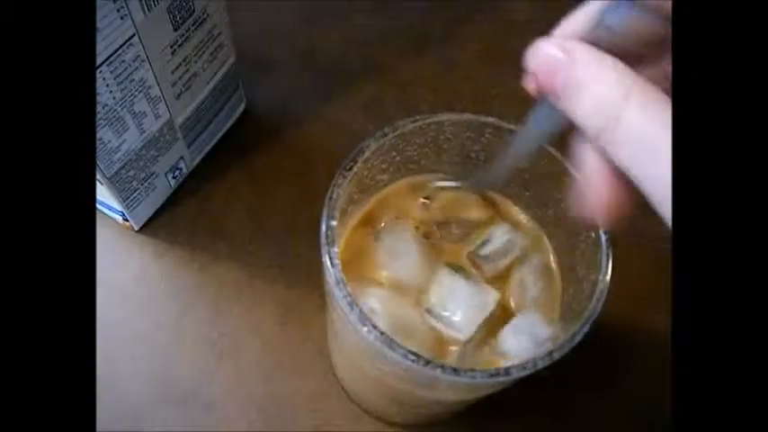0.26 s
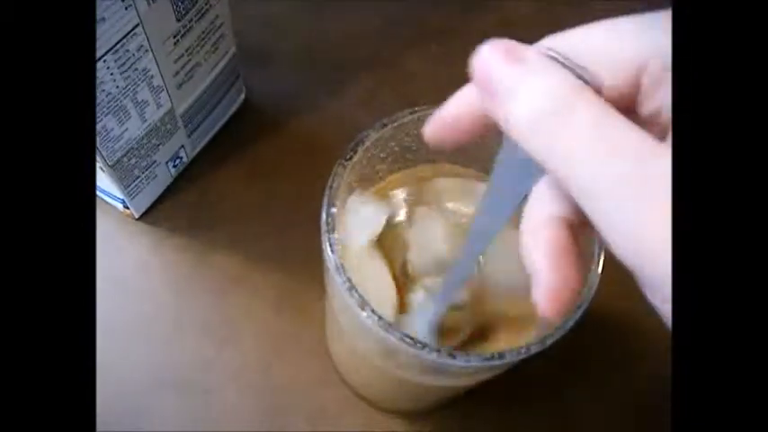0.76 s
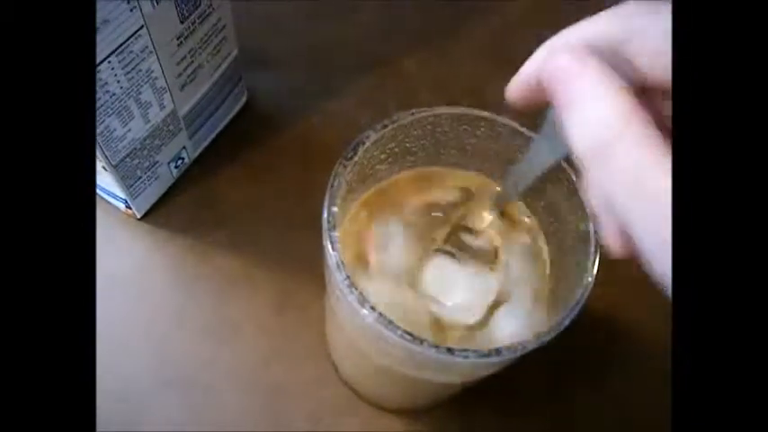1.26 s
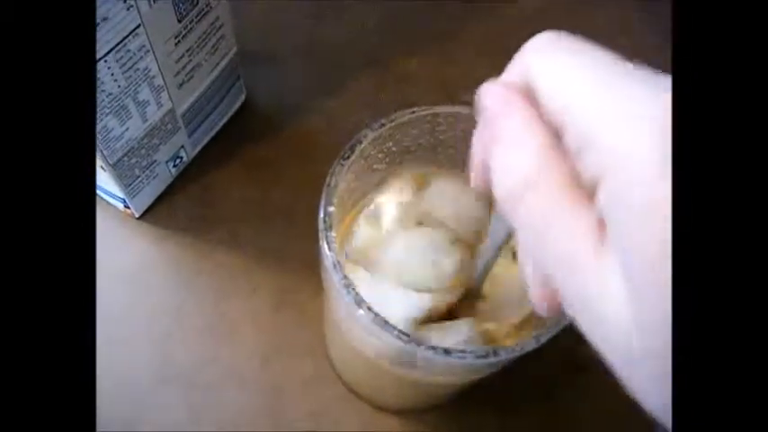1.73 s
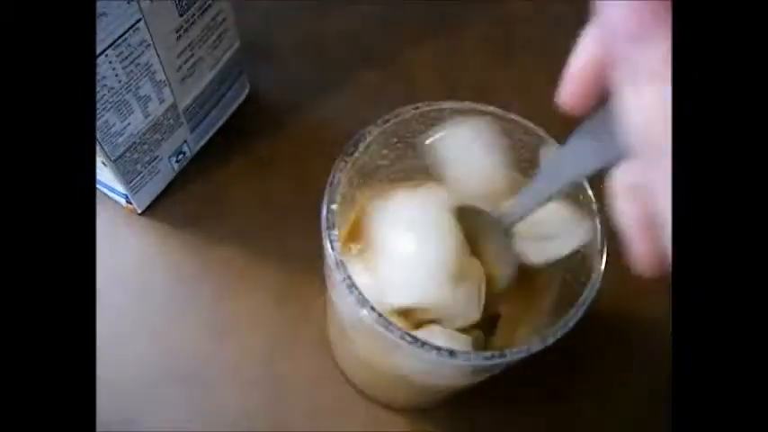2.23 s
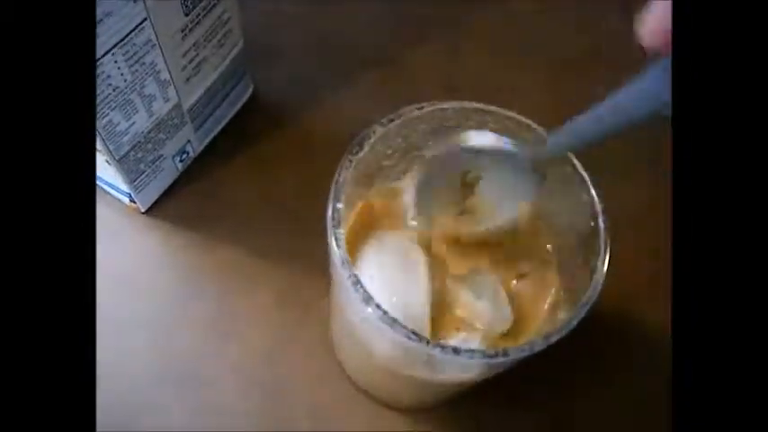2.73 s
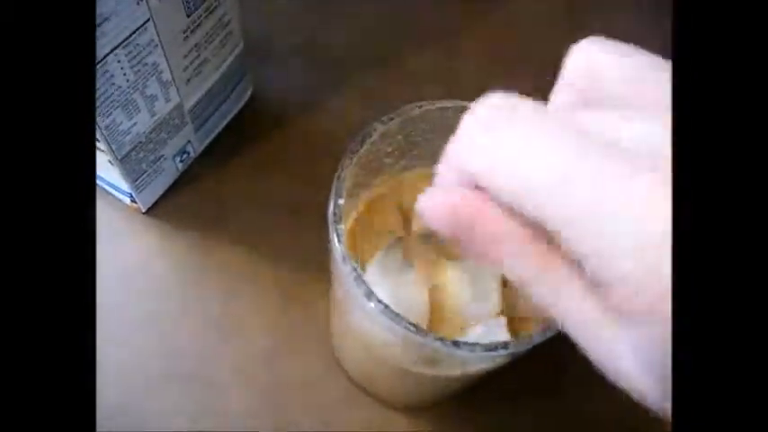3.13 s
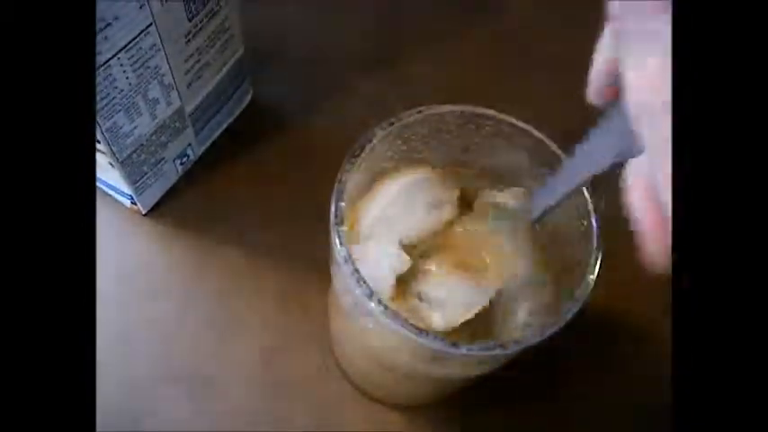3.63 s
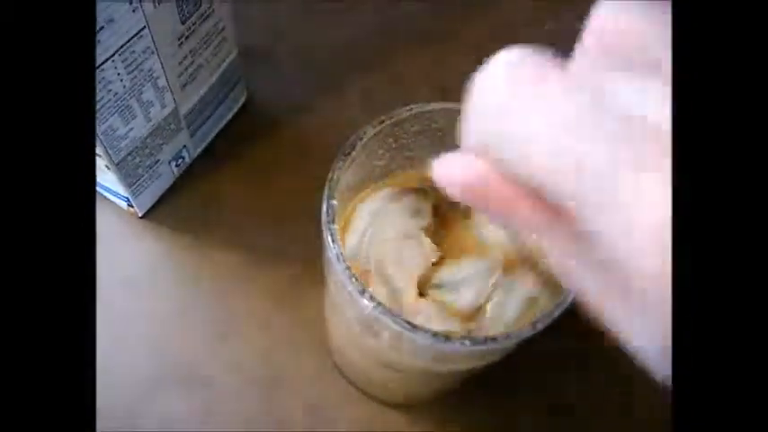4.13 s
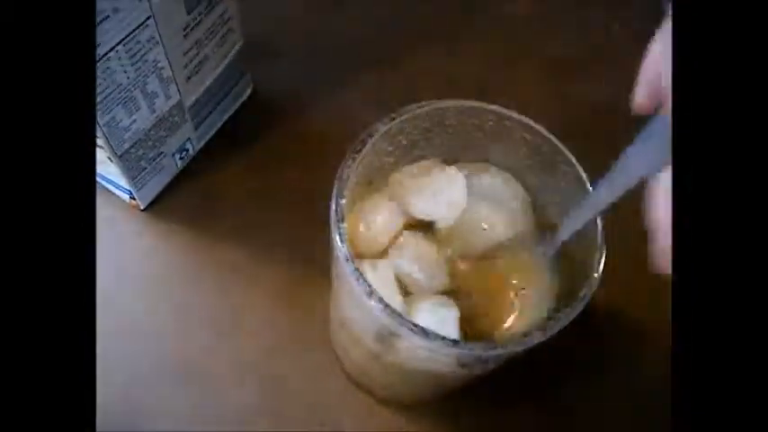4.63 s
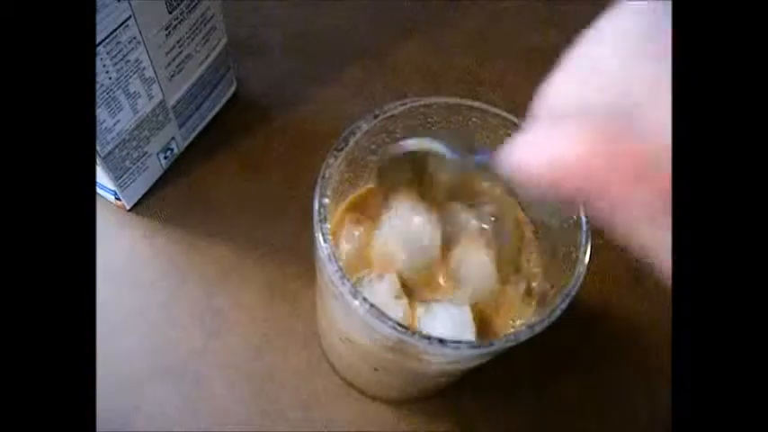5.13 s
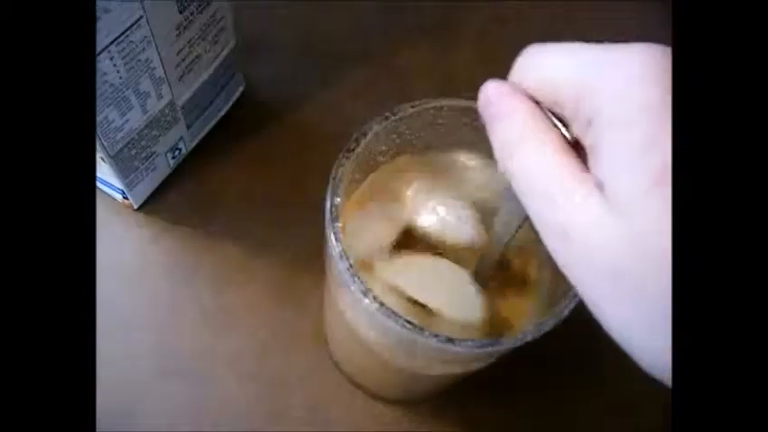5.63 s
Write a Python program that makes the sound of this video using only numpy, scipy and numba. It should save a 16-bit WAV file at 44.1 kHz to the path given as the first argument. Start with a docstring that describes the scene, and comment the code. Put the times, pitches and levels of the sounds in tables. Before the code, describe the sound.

A metal spoon stirs ice cubes in a nearly full cup of iced drink on a wooden table. Short glassy clicks come in uneven clusters, densest and loudest just after two seconds, over faint continuous rattling and scraping. Small thuds, dull wall hum and liquid blips sit beneath. Very close small microphone, dry indoor room, light hiss, peaks slightly overloaded.

```python
"""Ice stirred in a tumbler

A steel spoon stirs ice cubes in a glass on a wooden table, close to a small microphone.
Cubes and spoon knock as decaying sines and noise puffs, over many faint knocks and scraping friction noise.
The glass wall hums, jolts thud through the table top, liquid sloshes and gurgles as further decaying sines.
A short dull tail and steady hiss lie behind; the loudest peaks overload the recorder."""
import sys
import numpy as np
from scipy import signal
from scipy.fft import rfft, irfft, next_fast_len
from scipy.io import wavfile
from scipy.ndimage import uniform_filter1d
from numba import njit

SR = 44100
rng = np.random.default_rng(int(sys.argv[2]) if len(sys.argv) > 2 else 0)


def master_out(mix):
    """Clip the mix to full scale and print it as 16-bit PCM to the path in sys.argv[1]."""
    frames = np.transpose(np.atleast_2d(mix))
    ceiling = np.clip(frames, -1, 1)
    pcm = np.round(ceiling * 32767).astype(np.int16)
    wavfile.write(sys.argv[1], SR, pcm)


N = 259517  # length in samples

# Levels in these tables are relative: each source sets its own gain on top.
# Loud knocks of cubes and spoon. Each row: start [s], level [dB], cube pitch [Hz], its upper pitch [Hz],
# upper level [dB], sharpness [dB]; the last two relative to the knock.
KNOCKS = [(0.0014, -1.5, 2840, 3530, -2.5, -30), (0.0173, -9.5, 2700, 4370, -2, -4.5),
          (0.0583, -25, 2760, 3920, 6, -14), (0.072, 1, 2760, 3900, -9, -16.5),
          (0.0854, -5, 2790, 4000, -9, -43), (0.1053, -5, 2540, 4010, -16, -28),
          (0.1153, -3.5, 2480, 3950, -15, -18), (0.1393, -15, 2760, 3880, -20, -8),
          (0.1772, -8.5, 1940, 4600, -6, -10), (0.2044, -7, 1990, 4610, -16, -16),
          (0.2275, -2.5, 2830, 4000, -16, -12.5), (0.2442, 2.5, 3300, 4270, -7.5, -16),
          (0.2905, -7.5, 2920, 3900, -15, -19), (0.3394, -6, 2800, 3860, -14, -23),
          (0.4477, -11.5, 2730, 4000, -11, -21.5), (0.483, -13.5, 2740, 3870, -1, -7),
          (0.5103, -9.5, 2770, 4040, -4, -31), (0.5666, -23, 2750, 4000, -2, -22),
          (0.6292, -12, 2700, 3840, -28, -9), (0.7022, -0.5, 2680, 4400, -28, -29),
          (0.7367, -20.5, 2620, 4240, -5.5, -11), (0.7799, -7, 2800, 4080, -8, -21),
          (0.8261, -10.5, 3060, 4400, -9, -16), (0.9597, -9.5, 3100, 4050, -14, -26),
          (1.012, -7, 2920, 4050, -4.5, -21), (1.0334, -9, 2840, 4370, -3.5, -25),
          (1.0867, -17, 2850, 3810, -14, -37), (1.1113, -10, 2770, 3900, -21, -34),
          (1.1328, -6, 2890, 3900, -8, -28), (1.1437, -3, 2810, 4140, -8, -23),
          (1.1787, -10, 2710, 3960, -12, -12.5), (1.2465, -21.5, 2950, 3910, -1, -2.5),
          (1.3265, -6, 2690, 3660, -12, -28), (1.384, -14, 2580, 3690, -1, -19),
          (1.4223, -13, 2100, 3900, -5, -19), (1.4484, -7.5, 2590, 3790, -0.5, -15),
          (1.5048, -9, 2650, 4050, -15, -23), (1.5369, -26, 2740, 3900, -16, -16),
          (1.548, -3, 2770, 3826, -6.5, -9), (1.568, -23, 2830, 4000, -6, -21),
          (1.5963, -11.5, 2840, 3870, -4.5, -18), (1.6342, -13, 2730, 3970, -5, -23),
          (1.6452, -9.5, 2840, 4050, -3, -16), (1.6842, -10, 2690, 3960, -12, -30),
          (1.714, -13, 2740, 4880, -1, -15), (1.7334, -6, 2490, 3750, 0.5, -25),
          (1.7853, -12.5, 2460, 3910, -3, -12), (1.8, -15.5, 3010, 3950, 0, -15),
          (1.85, -5.5, 3200, 3400, -11, -22), (1.8679, -0.5, 3010, 4600, -19, -20),
          (1.8768, -13, 3070, 3770, -11, -17), (1.8865, 0.5, 3170, 4090, -16, -23),
          (1.92, -12, 2880, 3830, -4, -31), (1.948, -6.5, 3060, 3680, 0, -25),
          (1.9962, -6, 2870, 3870, -7, -22.5), (2.0104, -15, 2860, 3880, -9, -29),
          (2.0193, -4, 2820, 3900, -24, -34), (2.043, -7, 2360, 3770, -27, -32),
          (2.0643, -2.5, 2560, 4580, -17, -27.5), (2.1018, -17, 3280, 3430, -1.5, -29),
          (2.1542, -18, 3000, 4020, -5.5, -17), (2.1827, -2.5, 2240, 3350, -3.5, -39),
          (2.1986, -0.5, 2580, 4100, -13, -32), (2.2117, -10.5, 3220, 3900, -10, -27),
          (2.253, 0, 2500, 3450, -14, -24), (2.266, -3, 2900, 3650, -11, -27),
          (2.2716, 7.5, 2760, 4220, -12.5, -21.5), (2.3066, -3, 2740, 3620, -14, -25),
          (2.32, 4, 2480, 3940, -0.5, -16), (2.358, 6, 2220, 4600, -13, -26.5),
          (2.3781, 6, 2275, 4070, -8.5, -23.5), (2.4217, -5.5, 3270, 4030, -17, -35),
          (2.429, -5.5, 2320, 4550, -12, -21), (2.5109, 6, 2393, 3940, -16.5, -37),
          (2.5503, 3, 2550, 4680, -9, -18.5), (2.5634, -2.5, 2000, 4400, -6.5, -27),
          (2.612, -16.5, 3060, 4040, -1, -32), (2.6215, -9.5, 2590, 3940, -15, -30),
          (2.6512, -2.5, 2480, 3790, -13, -27), (2.7024, -2, 2500, 3680, -26, -12.5),
          (2.7216, -11.5, 2660, 3810, -5, -11), (2.7369, -9.5, 2470, 3930, -3, -33),
          (2.744, -13, 2450, 3820, -2, -20), (2.7746, -8, 2930, 3970, -3, -23),
          (2.8052, -5.5, 2600, 3620, -9, -36), (2.819, -11, 2660, 4050, -8, -14),
          (2.8228, -5, 2700, 4010, -7, -5), (2.8653, 2, 3060, 3966, -6, -14.5),
          (2.9048, -4, 1580, 3600, -19, -15.5), (2.9462, -10, 2710, 4040, -4, -24),
          (2.9764, 0.5, 2690, 4610, -15, -31), (2.9848, 0, 2010, 3640, -21, -10),
          (3.0143, 0.5, 2820, 3730, -10, -22), (3.0573, -6.5, 2820, 5070, -14, -20.5),
          (3.0942, -18, 2020, 3740, -17, -32), (3.1271, -5.5, 1610, 3970, -22, -40),
          (3.1337, -9, 2040, 4970, -17, -21), (3.1508, -4, 2900, 4120, -9, -24),
          (3.2147, -8.5, 2020, 4000, -6, -33), (3.269, -10, 2240, 3960, -5.5, -43),
          (3.3266, -10, 2820, 4210, 3.5, -10.5), (3.3379, 3, 2640, 3650, -14, -25),
          (3.3487, -4, 3000, 4000, -6, -16), (3.3797, -5.5, 3080, 3420, 1, -36),
          (3.389, -5, 2540, 4420, -5.5, -39), (3.4508, -7.5, 2770, 3720, -8, -41),
          (3.5633, -1, 2940, 4380, -11.5, -19), (3.5746, -5.5, 2620, 3880, -18, -7),
          (3.6006, -11.5, 2780, 3880, -7.5, -29), (3.6391, -8.5, 1630, 3840, -28, -40),
          (3.6526, -9, 1610, 3960, -30, -44), (3.6638, -3, 2760, 3960, -1, -32),
          (3.6759, -5.5, 2530, 4560, -17, -20.5), (3.7225, -0.5, 2460, 3760, -13, -33),
          (3.7705, -10.5, 2380, 3460, -17, -11.5), (3.828, -20.5, 2830, 3940, -7, -28),
          (3.8895, -1, 2720, 4790, -16, -18.5), (3.9399, -9, 2680, 3800, -17, -24),
          (3.9735, -24, 2720, 3680, -18, -13), (4.0206, -14.5, 2880, 3830, -12, -22),
          (4.0671, -8, 2640, 4270, -14, -13), (4.1024, -4.5, 2610, 4070, -6.5, -8.5),
          (4.1144, -26, 2950, 4370, -15, 12), (4.1339, -6.5, 2820, 4010, -3, -10),
          (4.143, 2, 2663, 4270, -2.5, -21), (4.192, -9, 2590, 3740, -1, -8),
          (4.2236, -3.5, 2800, 3930, -5, -33), (4.2424, -10, 2360, 3830, -5, -26),
          (4.2567, -16.5, 2610, 3630, -2, -9), (4.269, -8.5, 2750, 4340, -1, -16),
          (4.2794, -12, 2520, 4660, -18, -5), (4.336, -18, 2700, 3700, -1, -13),
          (4.3666, -12, 2530, 3870, -1, -21), (4.407, -11.5, 2490, 4180, 0, -20),
          (4.4179, -2, 2510, 3800, -1, -24.5), (4.437, -7, 2690, 3930, -9, -29),
          (4.4506, -3, 2640, 3990, -1, -26), (4.498, -21, 2820, 4010, -2, -17),
          (4.5113, -1.5, 2866, 3900, 0.5, -8.5), (4.5264, -22, 2780, 3860, 3, -23),
          (4.607, -7.5, 2500, 4160, -2.5, -28), (4.6151, -1, 2750, 3560, -7.5, -11.5),
          (4.6328, -10.5, 3020, 3400, -5, -32), (4.6673, -2.5, 2910, 3460, -18, -24),
          (4.6771, -5.5, 2320, 3730, -17, -21), (4.701, -2, 2220, 3680, -15, -42),
          (4.7269, -6, 2160, 3900, -4, -45), (4.7566, 2, 2150, 4990, -6.5, -16),
          (4.8204, -15.5, 2220, 3680, -2, -37), (4.8996, -13, 3360, 3950, -13, -36),
          (4.9358, -13, 1610, 3670, -31, -37), (4.9692, -7, 1680, 4670, -9, -35),
          (5.007, -18.5, 1950, 3800, -9, -37), (5.0664, -6, 2760, 5250, -16, -14),
          (5.1053, -11.5, 2660, 4270, -12, -18), (5.1272, 2, 2700, 5040, -8.5, -16.5),
          (5.2051, -5.5, 2590, 3760, -5.5, -21), (5.229, -11.5, 2930, 3870, -1, -23),
          (5.2518, -3.5, 2830, 4100, -3, -1.5), (5.2904, -17, 2820, 4360, -13, -15),
          (5.3144, -8, 1990, 4040, -17, -14), (5.3217, -2.5, 1750, 3950, -17, -28),
          (5.3336, -4.5, 1720, 3960, -1, -29), (5.3478, -12.5, 3000, 3930, 0, -13),
          (5.3757, -9.5, 1660, 3810, -2, -18), (5.3827, -11.5, 2700, 4770, -4, -14),
          (5.3961, -11.5, 1670, 4940, 5, -32), (5.442, -17, 2700, 3850, -3, -35),
          (5.5106, -15, 2750, 3820, -17, -39), (5.5817, -12.5, 2500, 3840, 0, -27),
          (5.6007, 2.5, 2530, 5050, -11, -25), (5.6357, -6, 2780, 3720, -12, -23),
          (5.6473, -9.5, 2840, 3800, -7, -13.5), (5.664, -6, 1950, 4200, -8, -27),
          (5.691, -10, 3220, 3670, -1, -35), (5.7265, -4.5, 2800, 3920, -4, -17),
          (5.7487, 2, 3270, 3710, -8.5, -28), (5.7634, -12.5, 2000, 3740, -5, -16),
          (5.7972, -7, 3170, 3550, 5, -16), (5.8168, -19, 2870, 3500, 3, -18),
          (5.8478, -5, 3130, 3800, -15, -22)]
# Blows that leave the spoon ringing. Each row: start [s], level [dB], pitch it rings most near [Hz].
CLINKS = [(2.5628, -4, 10400), (2.822, 1, 9030), (2.9841, 2.5, 10300), (3.7713, -8, 10100),
          (3.8916, -10, 9600), (3.9064, -24, 9210), (3.9404, -10.5, 10800), (3.9729, -26, 10800),
          (4.0677, -5.5, 9200), (4.0824, -17, 10800), (4.103, 6.5, 11000), (4.1154, -8, 11000),
          (4.1335, -25, 10700), (4.192, -21, 8860), (4.756, -3.5, 11300), (4.9686, -6.5, 10000),
          (5.0689, -2.5, 10900), (5.1058, -5, 11500), (5.2525, -6, 10800)]
# Cubes dragging along the wall. Each row: middle [s], half length [s], level [dB].
SLIDES = [(0.11, 0.006, -27), (0.398, .012, -16), (0.657, 0.031, -19), (0.821, 0.016, -22),
          (1.003, 0.024, -18.5), (1.129, 0.0072, -11.5), (1.876, 0.054, -13.5), (2.32, 0.0062, -27),
          (2.542, 0.0057, -6.5), (3.147, .008, -23), (3.208, 0.012, -19.5), (3.35, 0.027, -8.5),
          (3.519, 0.0058, -8), (4.198, 0.012, -16), (4.274, .02, -28), (4.595, 0.0084, -16.5),
          (4.704, 0.011, -25), (5.347, 0.026, -19), (5.598, 0.01, -21), (5.19, 0.013, -14.5),
          (5.7, 0.04, -18)]
# Blows and rubs that set the glass wall humming. Each row: start [s], level [dB].
HUMS = [(0.0114, -26), (0.063, -28), (0.1398, -21), (0.172, -23.5), (0.2349, -22), (0.34, -28),
        (0.6277, -25.5), (0.6946, -20), (0.7326, -19), (0.7775, -33), (1.0022, -19), (1.1164, -25),
        (1.1508, -18), (1.2395, -24), (1.2908, -26), (1.332, -25.5), (1.8808, -30), (2.3207, -24),
        (2.8624, -25.5), (2.9942, -27), (3.3946, -28), (3.4484, -26), (3.5189, -27), (3.5702, -33.5),
        (3.666, -23), (4.2245, -24), (4.2699, -24.5), (4.411, -24), (4.44, -31.5), (5.2557, -29),
        (5.314, -32), (5.3474, -23), (5.6521, -23), (5.74, -31)]
# Jolts through the table top. Each row: start [s], level [dB], pitch [Hz].
THUDS = [(0.25, -13.5, 458), (0.51, -20, 332), (0.638, -20.5, 172), (0.774, -20.5, 416),
         (0.994, -21.5, 390), (1.052, -23, 318), (1.135, -20, 348), (1.327, -25, 300), (1.422, -15, 484),
         (1.443, -7, 297), (1.476, -17, 157), (1.876, -20, 191), (2.047, -19.5, 223), (2.068, -22, 175),
         (2.201, -16.5, 276), (2.278, -23, 326), (2.559, -18.5, 394), (2.906, -15, 295), (3.016, -18, 470),
         (3.15, -15, 294), (3.35, -16, 180), (4.145, -13.5, 272), (4.226, -16.5, 320), (4.283, -14.5, 251),
         (4.449, -19, 305), (4.683, -24, 472), (4.709, -18, 285), (5.106, -17.5, 182), (5.135, -10.5, 310),
         (5.249, -27, 298), (5.35, -19.5, 243), (5.375, -17.5, 182), (5.395, -20.5, 270), (5.411, -19, 230),
         (5.589, -18, 378)]
# Round notes from the liquid. Each row: start [s], level [dB], pitch [Hz].
GURGLES = [(0.339, -20, 763), (0.377, -15, 770), (0.389, -17.5, 1030), (0.454, -17, 1075),
           (0.703, -14, 1080), (0.738, -19, 1130), (1.328, -10, 1030), (1.344, -35, 1080),
           (1.423, -17, 710), (2.066, -19, 960), (2.536, -17, 813), (3.015, -25, 724), (3.452, -25, 1030),
           (3.481, -16.5, 1110), (4.152, -19, 1130), (5.138, -21, 790)]
# Course of the stirring. Each row: time [s], small clatter level [dB], slosh level [dB].
STIRRING = [(0.0, -31.5, -33), (0.11, -25.5, -38.5), (0.46, -33.5, -38.5), (1.13, -28, -38.5),
            (1.39, -30, -34), (1.83, -32.5, -41.5), (2.24, -31.5, -41), (2.6, -37, -42.5),
            (2.82, -38.5, -44.5), (3.18, -31, -37), (3.54, -31.5, -38.5), (3.7, -35.5, -43),
            (3.91, -50, -45), (4.06, -37, -40.5), (4.27, -30, -35.5), (4.47, -29.5, -43),
            (4.57, -33.5, -38.5), (4.83, -37, -45), (5.01, -48.5, -53), (5.14, -44, -38), (5.27, -28, -36),
            (5.63, -31.5, -39), (5.76, -26.5, -44), (5.88, -24.5, -35)]

# Ringing modes of glass, spoon, glass wall and table top.
# Each row: nominal pitch [Hz], level [dB], typical time to fall 60 dB [s].
GLASS_LOW_MODES = [(2050, -11, 0.016), (2270, 3, 0.0093), (2632, 5.5, 0.029), (2724, -0.5, 0.098),
                   (2915, 6.5, 0.012), (3180, -6.5, 0.048)]
GLASS_HIGH_MODES = [(3869, -16, 0.064), (3792, 2.5, 0.015), (3900, -13.5, 0.11), (4350, -0.5, 0.0077),
                    (4657, -2, 0.02), (4800, -24, 0.03)]
GLASS_TOP_MODES = [(5040, -7, 0.12), (6180, -2, 0.03), (6360, 12.5, 0.0064), (6860, 4.5, 0.018)]
SPOON_MODES = [(9040, 0, .065), (9250, -7, .03), (10350, -6, .04), (10780, 0, .05), (11440, -5, .04),
               (12260, -10, .03), (13500, -16, .025), (15600, -12, .035)]
WALL_MODE = [(1223, 0, 0.2)]
TABLE_MODES = [(109, -7, 0.087), (170.6, 0, 0.12), (235, -3.5, 0.056), (310.4, 1.5, 0.1), (468, 3, 0.054),
               (780, -8, 0.11), (1110, -2.5, 0.05)]
# Colour of room rumble and microphone noise. Each row: frequency [Hz], relative density [dB per Hz].
HISS_COLOUR = [(20, -14), (58, 5), (75, -0.5), (110, -4), (200, -2), (1000, -48), (3500, -58), (8000, -27),
               (12000, -39), (16000, -36)]

HISS_DB = -46  # RMS level before the microphone
NOTCH_HZ, NOTCH_WIDTH_HZ = 7880, 1410
TOP_HZ = 16150  # upper limit of the recorder
CRACK_DB, CRACK_PER_SHARP_DB = 10.5, 0.79  # a sharper contact cracks more
# After a knock the load jostles, then settles: time constant [s], rest floor [dB], shares of that swing
SETTLE_S, REST_DB, JOSTLE_SHARE, SLOSH_SHARE = 0.02, -12, 0.54, 0.46
# In this stretch the knocks, loud and faint, carry more of the highest treble
CRISP_FROM_S, CRISP_TO_S, CRISP_DB = 2.1, 3.7, 6.5


def undb(db):
    """Turn decibels into an amplitude factor."""
    return 10 ** (np.asarray(db) / 20)


def decay_per_sample(t60):
    """Factor per sample of a decay that falls 60 dB in t60 seconds."""
    return np.exp(-np.log(1000) / (t60 * SR))


@njit
def add_sines(out, start, hz, t60, size, rise, turn):
    """Add one decaying sine per row; it swells over the contact time."""
    for k in range(len(hz)):
        step = np.exp(2j * np.pi * hz[k] / SR - np.log(1000) / (t60[k] * SR))
        wave = size[k] * np.exp(2j * np.pi * turn[k])
        soft, soft_step = 1., np.exp(-1 / (rise * SR))
        for i in range(start[k], min(len(out), start[k] + int(t60[k] * SR))):
            out[i] += wave.imag * (1 - soft) ** 2
            wave *= step
            soft *= soft_step


def strike(s, db, modes, scatter_db, detune, rise):
    """Every blow rings the same modes, each time with other strengths, and a little off pitch."""
    columns = np.moveaxis(np.array(modes, float), -1, 0)
    hz, mode_db, t60 = np.broadcast_arrays(*columns, np.zeros((len(s), 1)))[:3]
    mode_count = hz.shape[1]
    chance = rng.standard_normal((len(s), 4, mode_count))
    share = undb(mode_db + scatter_db * chance[:, 0])
    # The modes of one blow together carry its level
    size = undb(db)[:, None] * share / np.sqrt(np.sum(share ** 2, axis=1, keepdims=True))
    blow_hz = hz * (1 + detune * chance[:, 1])
    blow_t60 = t60 * np.exp(0.34 * chance[:, 2])
    start = np.repeat((s * SR).astype(int), mode_count)
    out = np.zeros(N)
    add_sines(out, start, blow_hz.ravel(), blow_t60.ravel(), size.ravel(), max(rise, 1e-5),
              chance[:, 3].ravel())
    return out


def lone(hz, t60):
    """One mode per blow, at that blow's pitch."""
    return np.stack([hz, 0 * hz, 0 * hz + t60], axis=1)[:, None]


def near(modes, hz, slope_db):
    """Where the blow lands picks the modes: they lose slope_db per octave from hz, at most 18 dB."""
    table = np.tile(np.array(modes, float), (len(hz), 1, 1))
    octaves = np.abs(np.log2(table[:, :, 0] / hz[:, None]))
    table[:, :, 1] -= np.minimum(slope_db * octaves, 18)
    return table


def walk(rate):
    """Random levels, rate per second, with glides between them."""
    hold = int(SR / rate)
    levels = np.repeat(rng.standard_normal(N // hold + 1), hold)
    return uniform_filter1d(levels, hold)[:N]


def burst(s, db, t60, lo_hz, hi_hz):
    """A decaying puff of band noise at each blow."""
    kicks = np.zeros(N)
    np.add.at(kicks, np.minimum(s * SR, N - 1).astype(int), undb(db))
    shape = signal.lfilter([1], [1, -decay_per_sample(t60)], kicks)
    shape = uniform_filter1d(shape, size=45, origin=22)  # the contact builds up over a millisecond
    band = signal.butter(2, [lo_hz, hi_hz], "band", fs=SR, output="sos")
    noise = signal.sosfilt(band, rng.standard_normal(N))
    return shape * noise / noise.std()


def blows():
    """The loud knocks of cubes and spoon against the glass and each other."""
    s, db, cube_hz, upper_hz, high_db, sharp_db = np.transpose(KNOCKS)
    return knock(s, db, cube_hz, upper_hz, high_db, CRACK_DB + CRACK_PER_SHARP_DB * sharp_db, sharp_db)


def knock(s, db, cube_hz, upper_hz, high_db, crack_db, treble_db):
    """The cube clicks at two pitches of its own, the glass rings, the contact cracks."""
    cube = strike(s, db - 2.0, lone(cube_hz, 0.017), 0, 0, 0.00064)
    cube += strike(s, db + high_db + 6.5, lone(upper_hz, 0.017), 0, 0, 0.00088)

    glass = strike(s, db - 12.5, GLASS_LOW_MODES, 11.4, 0.024, 0.00094)
    glass += strike(s, db + high_db - 1.5, GLASS_HIGH_MODES, 1.7, 0.014, 0.00012)
    glass += strike(s, db + crack_db - 9, GLASS_TOP_MODES, 4.6, 0.016, 0.00046)

    crisp_db = CRISP_DB * (s > CRISP_FROM_S) * (s < CRISP_TO_S)
    contact = burst(s, db - 28, 0.049, 596, 1810)
    contact += burst(s, db - 14.5, 0.025, 1596, 3280)
    contact += burst(s, db + crack_db - 12.5, 0.022, 3300, 6200)
    contact += burst(s, db + treble_db + 2.0, 0.013, 7470, 11970)
    contact += burst(s, db + treble_db - 0.7 + crisp_db, 0.0028, 13870, 14380)
    return cube + glass + contact


def clinks():
    """The bare spoon rings on in its high modes, strongest near each blow's pitch."""
    s, db, hz = np.transpose(CLINKS)
    return strike(s, db - 12.0, near(SPOON_MODES, hz, slope_db=124), 2.2, 0.002, 0.000068)


def clatter(stir_db, count=1500):
    """Cubes jostle all the time: many faint knocks that follow the stirring."""
    chance = rng.random((count, 2))
    colour = np.clip(rng.standard_normal((count, 5)), -2, 2)
    s = chance[:, 0] * N / SR
    db = stir_db[(s * SR).astype(int)] + 11.0 - 12 * chance[:, 1]
    cube_hz = 2740 * np.exp(0.087 * colour[:, 3])
    upper_hz = 3920 * np.exp(0.045 * colour[:, 4])
    high_db = -9 + 4.7 * colour[:, 0]
    crack_db = -13 + 12.2 * colour[:, 1]
    treble_db = -28 + 9.3 * colour[:, 2]
    return knock(s, db, cube_hz, upper_hz, high_db, crack_db, treble_db)


def scrape(stir_db):
    """Ice slides along the wall: fluttering friction noise through the glass modes."""
    t = np.arange(N) / SR
    slides = sum(undb(db) * np.exp(-((t - s) / half) ** 2) for s, half, db in SLIDES)
    steady = undb(stir_db + 3.47 * walk(120))
    rub = rng.standard_normal(N) * (steady + slides * undb(7.5 * walk(170)))
    ringing = 0
    for hz, db, t60 in GLASS_LOW_MODES + GLASS_HIGH_MODES:
        peak = signal.iirpeak(hz, hz * t60 * 2.2, SR)  # longer-ringing modes make narrower peaks
        ringing = ringing + undb(db) * signal.lfilter(*peak, rub)
    return undb(3) * ringing + undb(-22) * rub


def hum(stir_db, count=150):
    """Each rub restarts the wall tone, a little off pitch as the liquid level swings; jostling keeps it alive."""
    s, db = np.transpose(HUMS)
    chance = rng.random((count, 2))
    often = chance[:, 0] * N / SR
    faint_db = stir_db[(often * SR).astype(int)] - 2.5 - 9 * chance[:, 1]
    tone = strike(s, db, WALL_MODE, 0, 0.0107, 0.0015)
    tone += strike(often, faint_db, WALL_MODE, 0, 0.007, 0.0014)
    return tone * undb(3.0 * walk(40))  # cubes touch the wall and damp it by turns


def thuds():
    """Each jolt has its own low pitch on top of the table modes, and a dull low puff of noise starts with it."""
    s, db, hz = np.transpose(THUDS)
    own_pitch = strike(s, db + 0.5, lone(hz, 0.047), 0, 0, 0.0014)
    table_top = strike(s, db - 1.0, TABLE_MODES, 3.3, 0.054, 0.001)
    low_puff = burst(s, db - 10.5, 0.037, 80, 820)
    return own_pitch + table_top + low_puff


def gurgles():
    """Air pockets between the cubes sound short round notes."""
    s, db, hz = np.transpose(GURGLES)
    return strike(s, db + 0.5, lone(hz, 0.039), 0, 0, 0.0036)


def slosh(slosh_db, count=700):
    """The swirling load keeps nudging the table modes."""
    chance = rng.random((count, 2))
    s = chance[:, 0] * N / SR
    db = slosh_db[(s * SR).astype(int)] + 13.5 - 11 * chance[:, 1]
    return strike(s, db, TABLE_MODES, 3.3, 0.091, 0.00087)


def unrest():
    """How shaken the cubes are, in dB around its mean: jumps with every knock and dies away."""
    s, db = np.transpose(KNOCKS)[:2]
    kicks = np.zeros(N)
    np.add.at(kicks, (s * SR).astype(int), undb(np.minimum(db, -8)))
    shaken = signal.lfilter([1], [1, -np.exp(-1 / (SETTLE_S * SR))], kicks)
    shaken_db = 20 * np.log10(shaken + undb(REST_DB))
    return shaken_db - shaken_db.mean()


def room(x, t60, wet_db):
    """A short dull tail from table top and kitchen walls, as decaying noise convolved with the sound."""
    t = np.arange(int(t60 * SR)) / SR
    tail = rng.standard_normal(len(t)) * np.exp(-np.log(1000) * t / t60) * (t > .002)
    tail = signal.lfilter([.6], [1, -.4], tail)  # dulls the treble
    tail = tail / np.sqrt(np.sum(tail ** 2))
    return x + undb(wet_db) * signal.fftconvolve(x, tail)[:N]


def hiss():
    """Steady room rumble and microphone noise: white noise coloured in the spectrum."""
    hz, db = np.transpose(HISS_COLOUR)
    size = next_fast_len(N)
    bin_hz = np.arange(1, size // 2 + 2) * SR / size
    colour = undb(np.interp(np.log(bin_hz), np.log(hz), db))
    noise = irfft(rfft(rng.standard_normal(size)) * colour, size)[:N]
    return undb(HISS_DB) * noise / noise.std()


def scene():
    """Glass, ice, liquid and table in one room, with the steady hiss added."""
    s, clatter_column, slosh_column = np.transpose(STIRRING)
    t = np.arange(N) / SR
    unrest_db = unrest()
    stir_db = np.interp(t, s, clatter_column) + JOSTLE_SHARE * unrest_db
    slosh_db = np.interp(t, s, slosh_column) + SLOSH_SHARE * unrest_db
    ice = blows() + clinks() + clatter(stir_db) + scrape(stir_db)
    tumbler = ice + hum(stir_db) + thuds() + gurgles() + slosh(slosh_db)
    return (room(tumbler, t60=0.089, wet_db=-13.5) + hiss())[None]


def record(dry):
    """The housing cancels a band near 8 kHz and loses deep bass; peaks clip; the top is cut."""
    heard = signal.lfilter(*signal.iirnotch(NOTCH_HZ, NOTCH_HZ / NOTCH_WIDTH_HZ, SR), dry)
    heard = signal.lfilter(*signal.butter(2, 45, "high", fs=SR), heard)
    overloaded = np.clip(heard, -1, 1)
    top_cut = signal.ellip(10, .2, 85, TOP_HZ, fs=SR, output="sos")
    return signal.sosfilt(top_cut, overloaded)


dry = scene()
out = record(dry)
master_out(out)
```